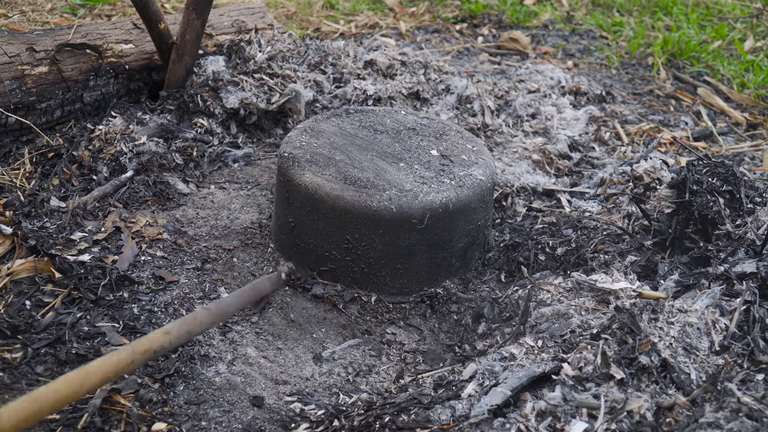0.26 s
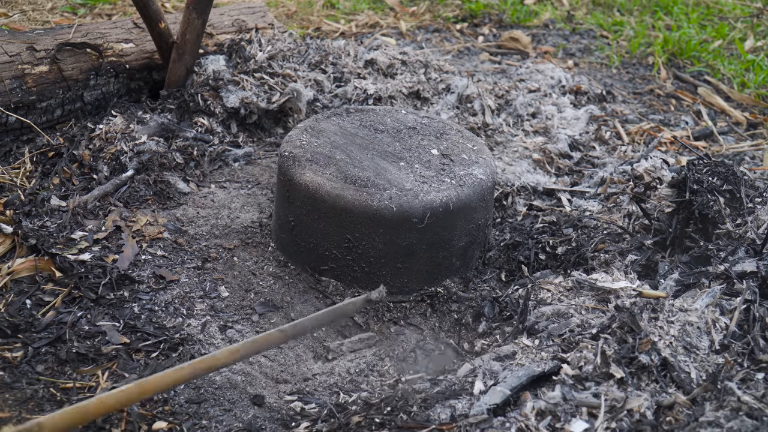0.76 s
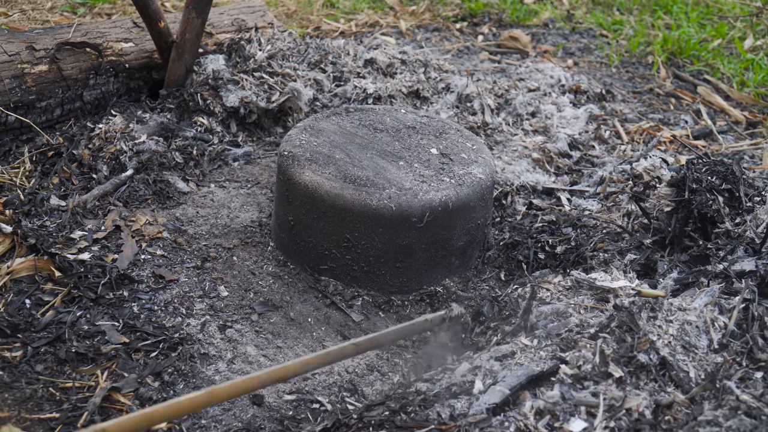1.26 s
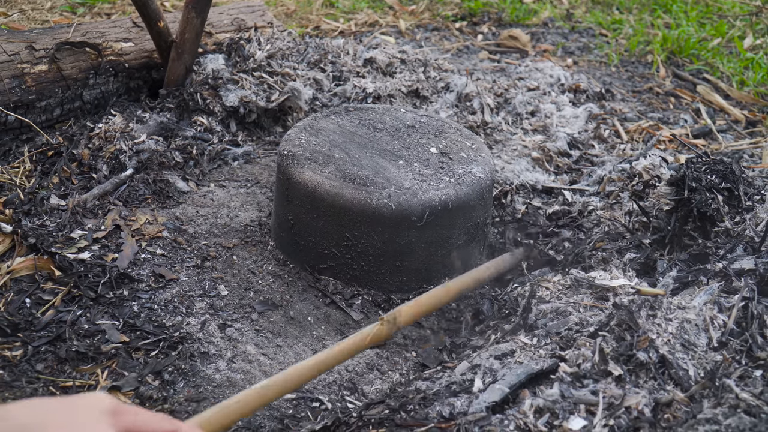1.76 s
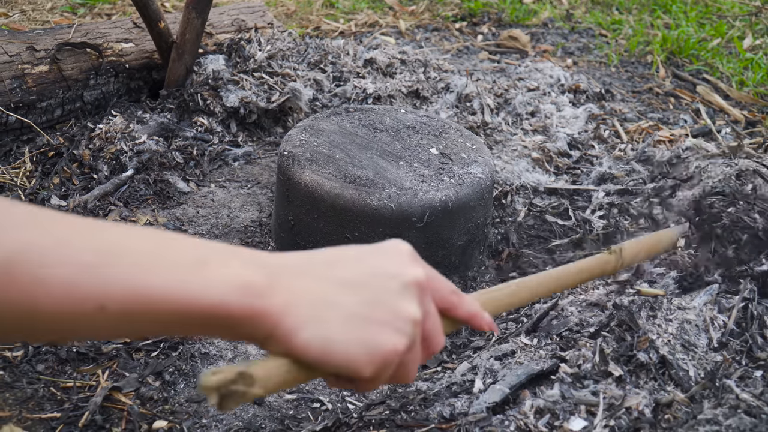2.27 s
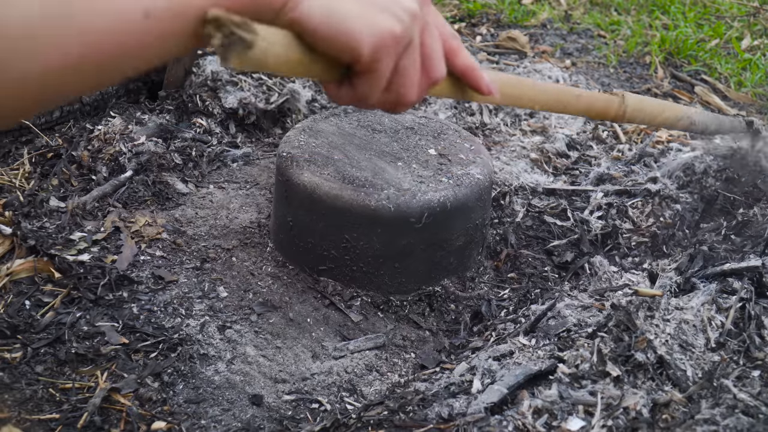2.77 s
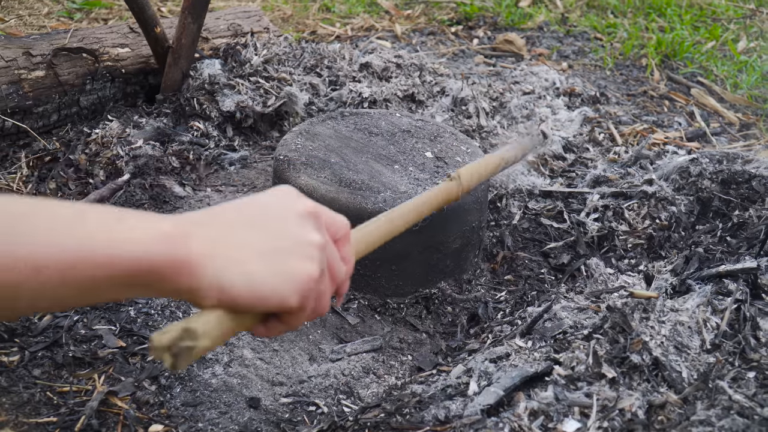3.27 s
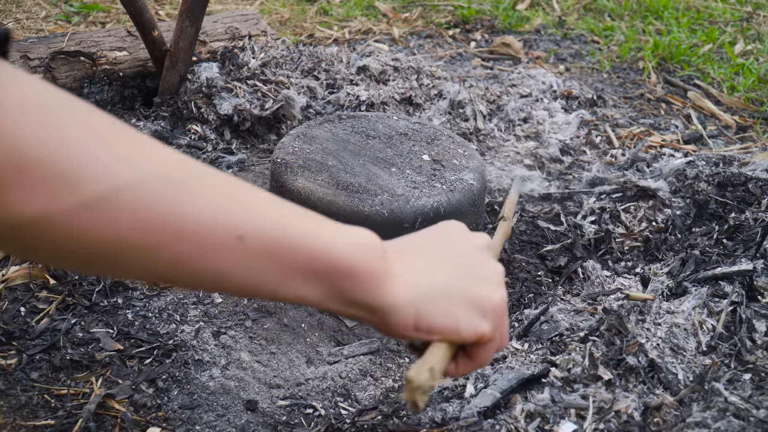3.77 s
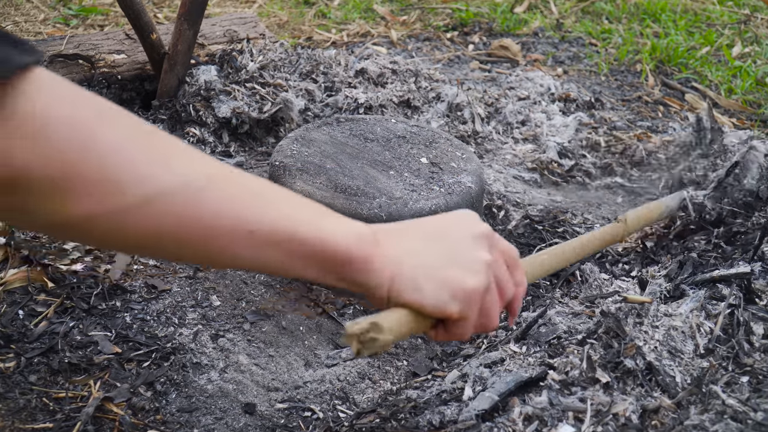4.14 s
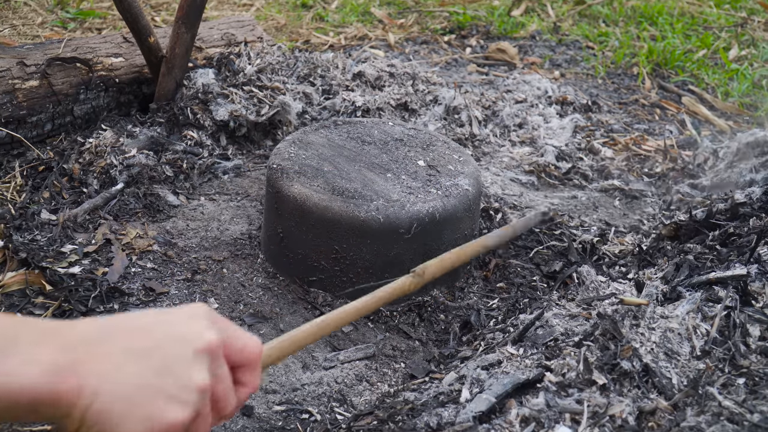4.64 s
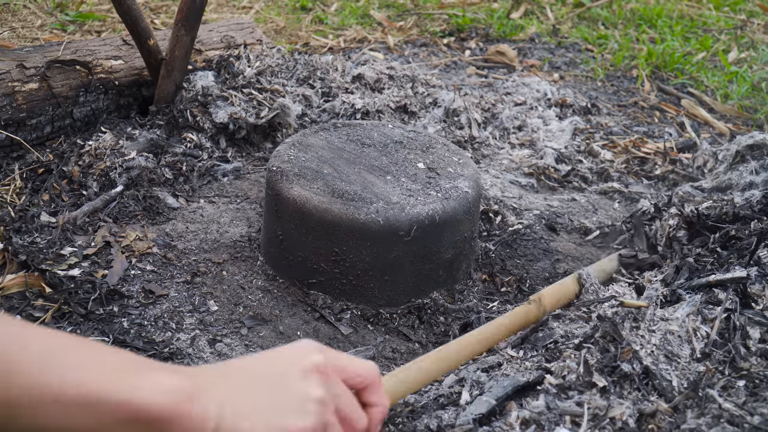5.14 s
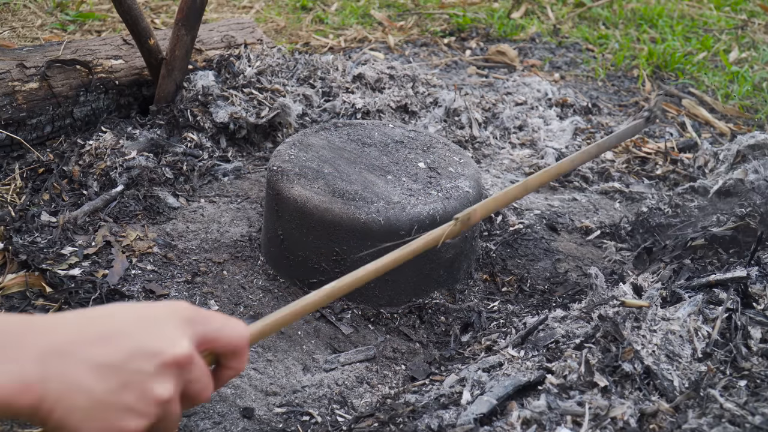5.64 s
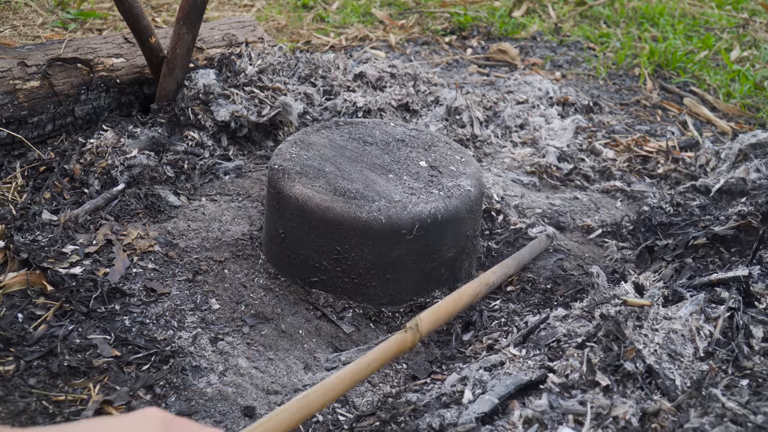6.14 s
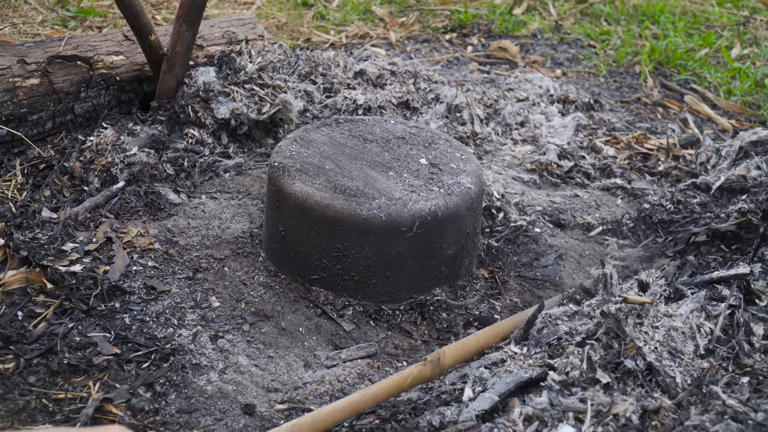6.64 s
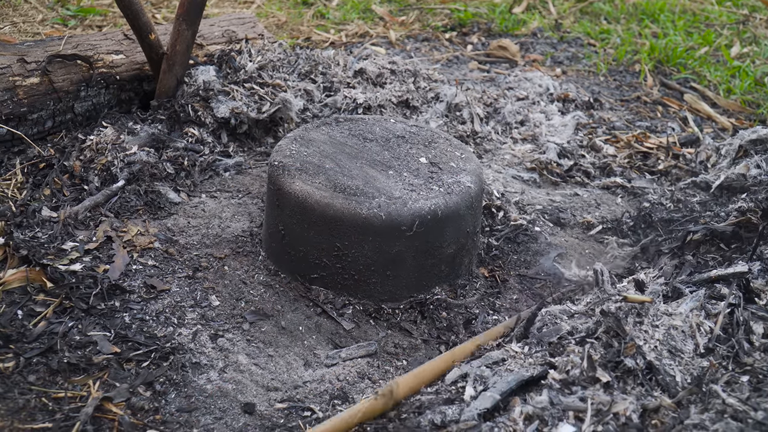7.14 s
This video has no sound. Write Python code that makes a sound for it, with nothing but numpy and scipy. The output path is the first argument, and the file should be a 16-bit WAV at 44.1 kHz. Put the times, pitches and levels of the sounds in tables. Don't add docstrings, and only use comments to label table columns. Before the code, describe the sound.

A quiet open yard, close dry mono pickup, with soft distant traffic swelling and fading and a barely audible very high insect whine. From 0.3 to 0.6 s a stick crunches into ash and charcoal, with a sharp snap and light knock near 0.65. Short gritty scrapes follow around 0.9 to 1.2. At 1.7 a quick pair of hollow thuds on an iron pot gives a short ring, running into a strong crunchy rake until 2. Soft ash hisses past around 2.3 and 2.7. At 3.26 a firm knock rings the pot, with weaker taps to 3.6. Crumbly raking returns at 3.9 to 4.3, then a harder crunch at 4.75 to 5.05 and a light sweep at 5.3. Two hard thuds at 5.83 and 5.89 ring briefly, leading into scraping. Charcoal crackles loudly at 6.4 to 6.6, and a last gritty rake runs from 7.05 to the end.

```python
import sys
import numpy as np
from scipy import signal
from scipy.fft import rfft, irfft, next_fast_len
from scipy.io import wavfile
from scipy.ndimage import uniform_filter1d

SR = 44100
rng = np.random.default_rng(int(sys.argv[2]) if len(sys.argv) > 2 else 0)


def nominal_scale(level):
    x = np.asarray(level, float) / 20
    return 10 ** x


def master_out(mix):
    frames = np.transpose(np.atleast_2d(mix))
    ceiling = np.clip(frames, -1, 1)
    pcm = np.round(ceiling * 32767).astype(np.int16)
    wavfile.write(sys.argv[1], SR, pcm)


N = 326781


def evened(x):
    return x / np.sqrt(np.mean(x ** 2) + 1e-20)


def add(mix, start_s, sound):
    part = mix[round(start_s * SR):][:len(sound)]
    part += sound[:len(part)]


def coloured(x, spectrum):
    points_hz, points_db = np.transpose(spectrum)
    hz = abs(np.fft.fftfreq(4096, 1 / SR))
    gain_db = np.interp(np.log(hz + 1), np.log(points_hz), points_db)
    log_gain = np.log(nominal_scale(np.maximum(gain_db, -80)))
    taps = np.fft.ifft(np.exp(np.conj(signal.hilbert(log_gain)))).real[:2048]
    return signal.oaconvolve(x, taps / np.linalg.norm(taps))[:len(x)]


def ring(hz, t60, seconds=.4):
    t = np.arange(round(seconds * SR)) / SR
    return np.sin(2 * np.pi * hz * t) * nominal_scale(-60 * t / t60)


def yard():
    # pitch_hz, level_db (per Hz)
    air = [(66, -32), (112, -2.5), (156, -1), (197, -7.5), (332, -11.5), (473, -24), (620, -29), (850, -23),
           (1000, -28), (1210, -27), (1620, -28.5), (2410, -34), (2680, -34), (8460, -48.5), (15200, -52),
           (16500, -70)]
    # time_s, level_db
    traffic = [(0, -0.5), (.8, 1), (1.4, 0.5), (2.4, .5), (3.07, -4.5), (3.46, 1), (3.9, 3), (4.37, -2.5),
               (4.86, -2.5), (5.59, -2), (6.1, 3.5), (6.6, -2.5), (7.0, -0.5), (7.4, 0.5)]
    level_db, swell_below_hz = -49, 448
    frames = N // 512 + 5
    hz = np.fft.rfftfreq(2048, 1 / SR)
    real, imag, patches = rng.standard_normal((frames, 1025, 3)).T
    patches = uniform_filter1d(patches, size=6, axis=0)
    patches = evened(uniform_filter1d(patches, size=12, axis=1))
    swell_db = np.interp(np.arange(frames) * 512 / SR, *np.transpose(traffic))
    swell_db = swell_db / (1 + (hz[:, None] / swell_below_hz) ** 2)
    air_hz, air_db = np.transpose(air)
    colour_db = np.interp(np.log(hz + 1), np.log(air_hz), air_db)[:, None]
    spectra = (real + 1j * imag) * nominal_scale(colour_db + 2.0 * patches + swell_db)
    sound = signal.istft(spectra, nperseg=2048, noverlap=1536)[1][:N]
    return nominal_scale(level_db) * evened(sound)


def insect():
    pitch_hz, level_db = 15050, -102
    b, a = signal.iirpeak(pitch_hz, 300, SR)
    return nominal_scale(level_db) * evened(signal.lfilter(b, a, rng.standard_normal(N)))


def pressure():
    # land_s, push_s, ease_s, grit_db, ash_over_grit_db
    rakes = [(.325, 0.013, 0.0092, -53, -0.5), (0.386, 0.037, 0.14, -52, -4.5),
             (.59, 0.015, 0.033, -58.5, -4), (0.634, 0.013, 0.026, -58.5, 6), (.925, 0.037, 0.053, -55, -3),
             (.99, 0.056, 0.043, -55, 1), (1.09, 0.041, 0.045, -59, -3), (1.151, 0.032, 0.024, -49.5, 2.5),
             (1.69, 0.2, 0.061, -42.5, -5), (1.939, 0.017, 0.079, -45, -2), (3.6, 0.011, .01, -65, -14),
             (3.849, 0.08, 0.066, -48, -7), (4.749, 0.15, 0.029, -44.5, -2.5),
             (4.9, 0.044, 0.077, -43.5, 1.5), (5.9, 0.027, 0.026, -59, 2),
             (5.955, 0.057, 0.15, -50.5, -4.5), (6.02, 0.095, 0.026, -49, -3),
             (6.352, 0.019, 0.047, -51.5, -6.5), (6.415, 0.026, 0.059, -50, -3),
             (6.5, 0.06, 0.064, -42, -4.5), (7.04, 0.019, .03, -55.5, -4), (7.105, 0.019, 0.04, -46.5, -1),
             (7.17, 0.14, 0.16, -48.5, -3)]
    # fastest_s, grit_db, ash_over_grit_db, rise_db_per_s, fall_db_per_s
    sweeps = [(.73, -70.5, 1, 40, 62), (.86, -72, -7, 43, 100), (1.28, -69.5, 0.5, 40, 66),
              (1.47, -79, -4.5, 47, 32), (2.26, -52.5, 0, 24.5, 29), (2.74, -60.5, -1.5, 28, 83),
              (3.75, -69, -19, 49, 20), (4.1, -55, -3.5, 40, 28), (4.3, -58.5, 0.5, 20, 40),
              (5.02, -54, -6.5, 300, 260), (2.05, -53.5, -3, 300, 150), (5.33, -56.5, 3, 30, 35),
              (6.25, -63.5, -9.5, 16, 32), (6.79, -62, -1, 33, 56)]
    rest_db, rest_ash_db = -77, -79
    land_db, lift_db = -9.5, -7.5
    edge_s, lift_s = 0.006, 0.011
    trickle_db, trickle_db_per_s = -20.5, -45
    steep = np.array([[1], [1.3]])
    t = np.arange(0, N, 32) / SR
    power = nominal_scale(2 * np.array([[rest_db], [rest_ash_db]])) * np.ones(len(t))
    for land, push, ease, db, ash_db in rakes:
        hardest = land + push
        lift = land + push + ease
        since_lift = np.maximum(t - lift, 0)
        push_db = np.interp(t, [land, hardest, lift], [land_db, 0, lift_db])
        touch = np.clip((t - land) / edge_s, 0, 1) * nominal_scale(-40 * since_lift / lift_s)
        slide_db = trickle_db + trickle_db_per_s * since_lift
        shape = touch * nominal_scale(2 * steep * push_db) + (t > hardest) * nominal_scale(2 * steep * slide_db)
        power = power + shape * nominal_scale(2 * np.array([[db], [db + ash_db]]))
    for fastest, db, ash_db, rise, fall in sweeps:
        glide_db = np.minimum(rise * (t - fastest), fall * (fastest - t))
        power = power + nominal_scale(2 * (steep * glide_db + [[db], [db + ash_db]]))
    return [np.interp(np.arange(N) / SR, t, p) for p in power]


def burst(t60, rise_s):
    age = np.arange(3000) / SR
    return np.minimum(age / rise_s, 1) ** 2 * nominal_scale(-17.0 - 120 * np.maximum(age - rise_s, 0) / t60)


def clumps(size):
    smooth = uniform_filter1d(rng.standard_normal(N), size=size)
    return evened(uniform_filter1d(smooth, size=size))


def grains(per_s, spread_db, bed, load_db):
    size = nominal_scale(spread_db * np.minimum(rng.exponential(1, N), 4)) * rng.standard_normal(N)
    clicks = evened(size * (rng.random(N) < per_s / SR))
    mixed = (clicks + bed * rng.standard_normal(N)) / np.sqrt(1 + bed ** 2)
    return evened(mixed * nominal_scale(load_db))


def raking():
    # pitch_hz, level_db (per Hz)
    grit_colour = [(590, -7.5), (1000, 4), (1570, -1), (2740, 8), (2970, 7), (3620, 4), (4060, -2),
                   (5220, -0.5), (6490, -11), (8000, -36), (10400, -45), (17600, -120)]
    ash_colour = [(3240, -28.5), (5500, 0), (6460, -6.5), (9420, -3.5), (10400, -4), (11000, -2.5),
                  (14600, -4.5), (16100, -9), (16500, -55)]
    drag_colour = [(220, -33), (380, -10), (822, -6.5), (943, -7), (1020, -34), (1090, -23), (1210, -24.5),
                   (1700, -24), (2210, -70), (3740, -120)]
    # time_s, level_db
    shaft = [(0.0, -61), (.7, -62.5), (1.09, -58.5), (1.65, -64.5), (1.83, -52), (2.05, -60), (2.39, -61),
             (3.16, -72.5), (3.44, -59.5), (4.02, -54.5), (4.6, -64), (4.89, -58.5), (5.65, -67.5),
             (6.16, -52.5), (6.3, -52.5), (6.4, -57.5), (7.1, -63), (7.3, -55)]
    # start_s, crunch_db, hiss_db
    crumbs = [(.388, -37, -45), (.396, -35, -35), (.4644, -48, -55), (.4805, -37, -41), (.503, -41, -41),
              (.5364, -56, -42), (.5695, -45, -41), (1.1363, -39, -59), (1.1724, -27.5, -36),
              (1.4491, -43, -70), (1.4935, -47, -50.5), (3.896, -35.5, -48), (4.1003, -34, -28.5),
              (4.4618, -45.5, -51), (4.798, -30, -48), (4.8768, -25, -28), (4.9482, -50, -44),
              (5.0474, -44, -44), (6.1144, -36, -37), (6.3954, -55, -42), (6.4248, -29.5, -38),
              (6.4388, -29, -35), (6.459, -35, -39), (6.603, -36, -38), (6.613, -36, -37),
              (7.037, -42, -46), (7.3238, -30.5, -23.5)]
    # start_s, crunch_db, hiss_db, knock_db
    clods = [(.4157, -40, -44, -35.5), (.4345, -27, -36, -45), (.4474, -33.5, -40, -42),
             (.5495, -33, -40, -35), (.9241, -31, -35.5, -46), (1.1908, -32, -40, -39),
             (1.769, -49, -50, -43), (1.947, -34, -36.5, -46), (3.974, -40, -54, -33),
             (4.302, -55, -55, -38.5), (4.7585, -32, -32, -53), (4.816, -39, -51, -39),
             (4.836, -31, -56, -44), (4.9017, -39, -52, -33), (5.9514, -42, -43, -43),
             (5.9887, -30, -38, -26.5), (6.5335, -38, -32.5, -31), (6.5637, -44, -33, -35),
             (7.0574, -24, -29.5, -53), (7.119, -38, -39, -35.5), (7.1777, -48, -46, -50),
             (7.194, -40, -44, -34.5)]
    # pitch_hz, width_hz
    lump_sizes = [(1300, 870), (2400, 1230), (3500, 1770), (4900, 1120)]
    specks_per_s, speck_db = 70, -10.5

    t = np.arange(N) / SR
    power = np.array([*pressure(), nominal_scale(2 * np.interp(t, *np.transpose(shaft)))])
    stroke_db = 10 * np.log10(power[0])
    for bits, t60, rise_s in (crumbs, 0.023, 0.001), (clods, 0.037, 0.0037):
        for start, *burst_db in bits:
            for layer, db in zip(power, burst_db):
                add(layer, start - rise_s / 2, nominal_scale(2 * db) * burst(t60, rise_s))

    load = clumps(size=200)
    press = np.clip((stroke_db + 64.5) / 18, .15, 1)
    clicks = grains(4000, 1.7, 0.5 / press, 0.56 * press * load)
    lumps = np.zeros(N)
    for k, (hz, width_hz) in enumerate(lump_sizes):
        b, a = signal.iirpeak(hz, hz / width_hz, SR)
        waver = nominal_scale(1.7 * press * clumps(size=350))
        lumps += (-1) ** k * waver * signal.lfilter(b, a, clicks)
    grit = evened(coloured(lumps, grit_colour))

    ash_load_db = 0.31 * press * load + 0.52 * clumps(size=300)
    ash = coloured(grains(6500, 2.4, 0.5 / press, ash_load_db), ash_colour)
    puff = rng.standard_normal(60) * np.hanning(60)
    specks = signal.oaconvolve(grains(specks_per_s, 5.4, 0, 0), puff)[:N]
    ash = ash + nominal_scale(speck_db) * evened(coloured(specks, ash_colour))

    drag = coloured(grains(1500, 1.1, 1.9, 1.0 * clumps(size=400)), drag_colour)
    return (np.sqrt(power) * [grit, ash, drag]).sum(0)


def chips():
    # start_s, level_db, pitch_hz
    chip_hits = [(0.4004, -35, 2660), (0.4404, -31, 3590), (0.4654, -39, 4430), (0.5044, -40, 3410),
                 (1.7684, -37, 3650), (1.8114, -30, 3660), (1.8614, -26, 2880), (1.9164, -34, 2860),
                 (1.9644, -33, 2300), (1.9844, -39, 3490), (4.782, -31, 2530), (4.8224, -33, 2770),
                 (4.8344, -30, 2330), (4.9154, -33, 3270), (4.9834, -34, 2500), (5.0154, -38, 2720),
                 (5.9404, -35, 1800), (6.0402, -35, 3500), (6.0564, -36, 3340), (6.105, -32, 1730),
                 (6.1194, -36, 2460), (6.357, -40, 2190), (6.3674, -37, 2590), (6.3734, -37, 2940),
                 (6.3784, -41, 3450), (6.3954, -44, 3140), (6.5116, -31, 2720), (6.542, -31, 2690),
                 (6.5474, -32, 3930), (6.5564, -30, 2830), (6.5674, -31, 2030), (6.5774, -34, 2840),
                 (6.5934, -33, 2120), (6.6054, -32, 3470), (7.2489, -35, 2680), (7.2659, -35, 2180),
                 (7.2983, -38, 2290)]
    # start_s, peak_db, pitch_hz, t60_s
    pinches = [(3.2564, -20, 4180, .011), (3.2562, -30, 5900, .012), (5.8312, -29, 5450, .02),
               (5.8315, -24, 3650, .02), (3.345, -40, 4550, .02), (1.663, -35, 4950, .035),
               (1.7135, -40, 4950, .025), (5.892, -35, 4950, .02), (5.8918, -20, 1000, .025),
               (6.645, -44, 800, .02)]
    t60, level_db = 0.009, -4
    out = np.zeros(N)
    for s, db, hz in chip_hits:
        chip = ring(hz, t60, .02) - .6 * ring(1.49 * hz, .6 * t60, .02)
        add(out, s, nominal_scale(db + level_db) * chip)
    for s, db, hz, pinch_t60 in pinches:
        add(out, s, nominal_scale(db) * ring(hz, pinch_t60, .06))
    return out


def cracks():
    # start_s, level_db, t60_s, centre_hz, tick_over_body_db
    contacts = [(.638, -42, 0.02, 5400, 10.5), (.646, -32, 0.044, 1670, -17),
                (1.6596, -30.5, 0.059, 4400, -4), (1.707, -41, 0.064, 3480, 5),
                (1.7132, -28, 0.02, 1100, -15), (3.2565, -33, 0.016, 4240, -6),
                (3.2566, -20, 0.027, 1270, -40), (3.344, -43, 0.031, 4420, -18),
                (3.368, -55, 0.17, 4530, -11), (3.39, -50, 0.057, 4800, -9), (3.403, -49, 0.04, 3200, 2),
                (3.4633, -48, 0.053, 4430, -11), (3.628, -47, 0.039, 3170, -6),
                (5.831, -27, 0.035, 3660, -3.5), (5.8312, -19, 0.022, 930, -33),
                (5.886, -52, 0.018, 4800, 10), (5.8914, -15, 0.02, 1440, -20)]
    # pitch_hz, level_db (per Hz)
    tick_colour = [(2350, -32.5), (4000, -5), (5540, -15.5), (6250, -21), (13800, -17), (16000, -28)]
    width_hz = 1510
    out, ticks = np.zeros(N), np.zeros(N)
    t = np.arange(4000) / SR
    noise = rng.standard_normal((len(contacts), 2, len(t)))
    for (s, db, t60, hz, tick_db), (body, tick) in zip(contacts, noise):
        b, a = signal.iirpeak(hz, hz / width_hz, SR)
        body = evened(signal.lfilter(b, a, signal.lfilter(b, a, body)))
        add(out, s, nominal_scale(db - 60 * t / t60) * body * np.minimum(t / 0.00022, 1))
        add(ticks, s, nominal_scale(db + tick_db - 80 * t / t60) * tick * np.minimum(t / .0008, 1))
    return out + coloured(ticks, tick_colour)


def thuds():
    # start_s, thump_db, thump_hz, t60_s, cane_knock_db
    blows = [(0.6465, -31, 980, 0.0094, -21.5), (.646, -30, 252, 0.02, -61), (1.7084, -14, 284, 0.017, -39),
             (1.661, -15, 234, 0.026, -20.5), (1.7131, -7.5, 243, 0.01, -10), (1.732, -21, 287, 0.036, -27),
             (1.762, -25, 304, 0.021, -48), (1.813, -32, 240, .025, -50), (1.787, -20, 234, 0.019, -39),
             (3.2558, -7, 222, 0.029, -7.5), (3.3442, -8.5, 223, 0.015, -32), (3.372, -28, 248, 0.034, -46),
             (3.405, -29.5, 246, 0.024, -43), (3.4618, -19.5, 264, 0.017, -24),
             (3.628, -24, 298, 0.015, -50), (5.8306, -5.5, 210, 0.02, -12), (5.8908, -6, 233, 0.026, -8),
             (5.8948, -24, 260, .03, -13), (5.893, -30, 800, .08, -60), (3.2595, -22, 250, 0.017, -40),
             (5.908, -20, 270, 0.038, -32), (5.979, -24, 232, 0.034, -33), (7.06, -30, 387, 0.015, -43)]
    cane_hz, cane_t60 = 533, 0.018
    out, t = np.zeros(N), np.arange(4000) / SR
    knock = -np.sin(2 * np.pi * cane_hz * t) * nominal_scale(-60 * t / cane_t60) * np.minimum(t / 0.0018, 1)
    for s, db, hz, t60, cane_db in blows:
        stiffening = 1 + 1.15 * np.exp(-t * hz / 0.17)
        swing = np.sin(2 * np.pi * hz * np.cumsum(stiffening) / SR) * np.minimum(t * hz / .5, 1)
        add(out, s, nominal_scale(db - 60 * t / t60) * swing + nominal_scale(cane_db) * knock)
    return out


def snaps():
    # centre_s, peak_db, pitch_hz, length_cycles
    twigs = [(0.646, -8.5, 1920, 0.53), (1.281, -45, 4000, 1.8), (1.4935, -48, 4300, 2.8),
             (1.883, -29, 2680, .6), (4.1012, -32.5, 4700, 4.1), (4.761, -30, 3590, 6.5),
             (4.883, -28, 2700, 0.76), (5.048, -37, 2250, 1.4), (6.426, -23, 7000, 0.23),
             (6.4305, -17.5, 7000, 0.25), (6.4385, -37, 5000, .5), (7.0608, -27, 2500, 1.1)]
    out, t = np.zeros(N), np.arange(-150, 150) / SR
    for s, db, hz, cycles in twigs:
        swings = np.sin(2 * np.pi * hz * t) * np.exp(-(t * hz / cycles) ** 2)
        add(out, s + t[0], -nominal_scale(db + 0.5) * swings)
    return out


def pot():
    # start_s, first_mode_db, lower_twin_db, upper_twin_db, fourth_mode_db
    rings = [(1.661, -44, -36.5, -39, -49), (1.67, -50, -42, -43, -62), (1.7135, -23, -29.5, -20.5, -41.5),
             (1.732, -37, -39, -36, -60), (3.2565, -16.5, -33.5, -28, -25.5), (3.345, -37, -60, -63, -50),
             (3.404, -43, -43.5, -66, -52.5), (3.464, -33.5, -56, -70, -57), (3.629, -39.5, -53, -52, -44),
             (5.832, -42, -29, -34, -43), (5.8914, -13, -20.5, -25.5, -25)]
    # pitch_hz, t60_s
    wall = [(702, 0.1), (1179, .19), (1242, 0.13), (1800, 0.23)]
    # pitch_hz, level_db, t60_s
    cluster = [
        [(2106, 1, 0.05), (2320, 2, 0.035)],
        [(3440, 1, 0.047), (3520, -6, 0.066), (3640, -1, 0.019), (3770, -6, 0.07)],
        [(3970, -5, 0.076), (4160, -1, .055), (4380, -3, 0.031), (4490, -11, 0.076), (4680, -6, .055),
         (4900, 2, 0.033), (5500, -1, .025)],
    ]
    # start_s, low_db, middle_db, high_db
    clangs = [(1.66, -40.5, -36, -37), (1.7148, -35, -59, -59), (3.256, -55, -46, -33.5),
              (3.345, -52, -65, -55), (3.63, -55, -58, -63), (5.8311, -27, -25, -32),
              (5.8915, -25, -33, -42)]
    # pitch_hz, level_db, t60_s
    rim = [
        [(2697, 0, .12)],
        [(3004, 0, .14), (3205, -8, .14)],
        [(3688, 0, .13)],
    ]
    # start_s, low_db, middle_db, high_db
    pings = [(1.66, -52, -43, -48), (1.7148, -60, -58, -58), (3.256, -46, -35, -47), (3.345, -56, -66, -47),
             (3.63, -50, -62, -58), (5.8312, -31, -38, -40), (5.892, -50, -45, -39)]
    out = np.zeros(N)
    for s, *modes_db in rings:
        add(out, s, sum(nominal_scale(db) * ring(hz, t60) for db, (hz, t60) in zip(modes_db, wall)))
    for blows, groups in (clangs, cluster), (pings, rim):
        families = []
        for group in groups:
            modes = [(-1) ** k * nominal_scale(db) * ring(hz, t60) for k, (hz, db, t60) in enumerate(group)]
            families.append(sum(modes))
        for s, *families_db in blows:
            add(out, s, nominal_scale(np.array(families_db)) @ families)
    return out


def scene():
    place = yard() + insect()
    charcoal = raking() + chips() + snaps()
    blows = cracks() + thuds() + pot()
    return (place + charcoal + blows)[None]


def top_cut(x):
    return signal.sosfilt(signal.butter(12, 16660, fs=SR, output="sos"), x)


def record(dry):
    low_cut_hz, top_hz = 113.5, 15750
    size = next_fast_len(N)
    hz = np.fft.rfftfreq(size, 1 / SR)
    low_db = -48 / (1 + np.exp(np.minimum((hz - low_cut_hz) / 0.87, 50)))
    top_db = -22 / (1 + np.exp(np.minimum((top_hz - hz) / 30, 50)))
    cut = irfft(rfft(dry, size) * nominal_scale(low_db + top_db), size)[:, :N]
    self_noise = signal.lfilter([1], [1, -.98], rng.standard_normal(N))
    return top_cut(cut + nominal_scale(-99) * evened(self_noise))


dry = scene()
out = record(dry)
master_out(out)
```